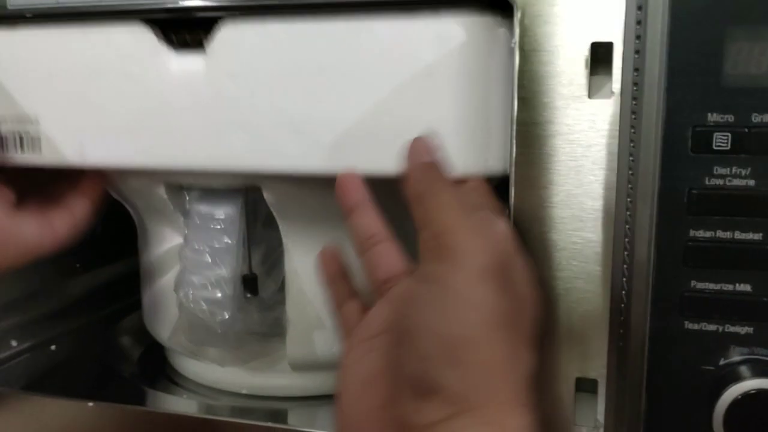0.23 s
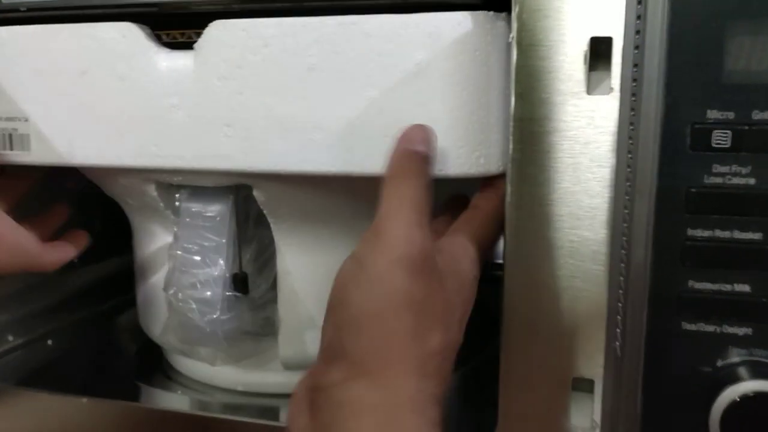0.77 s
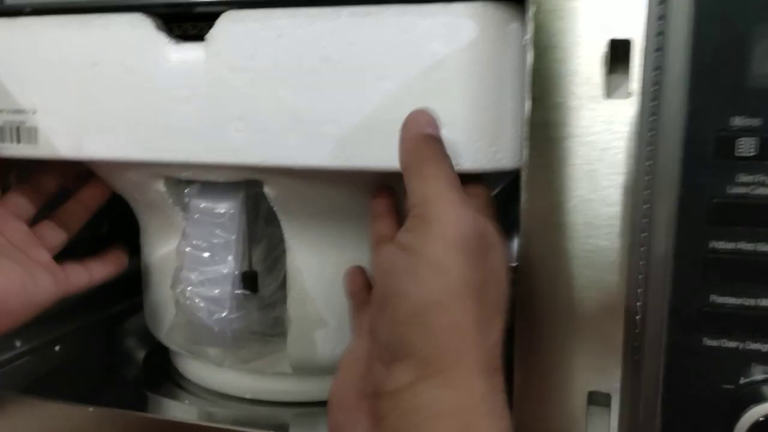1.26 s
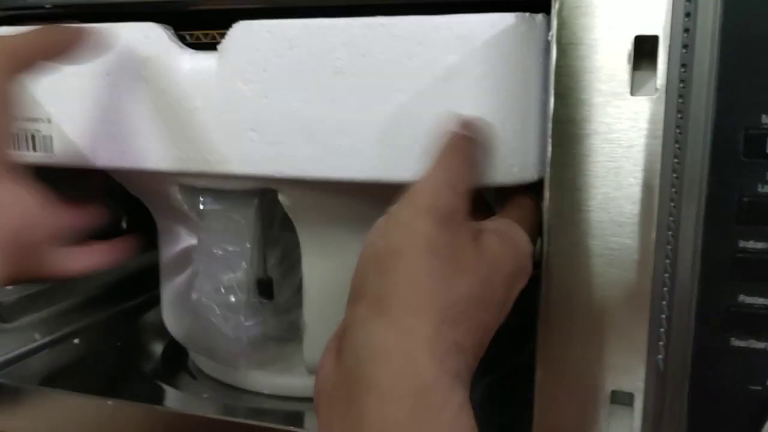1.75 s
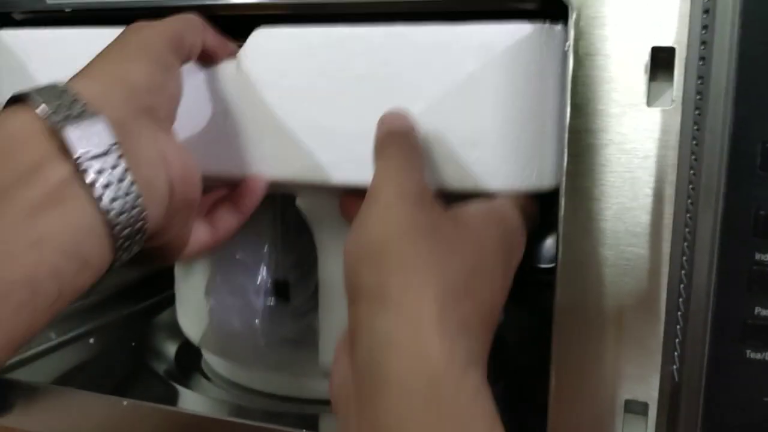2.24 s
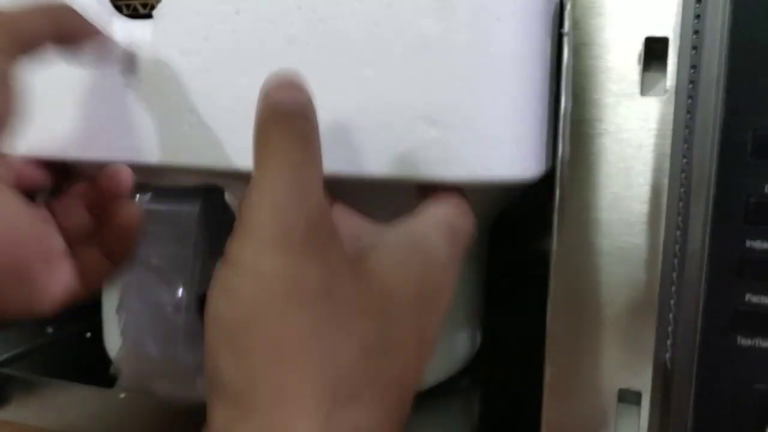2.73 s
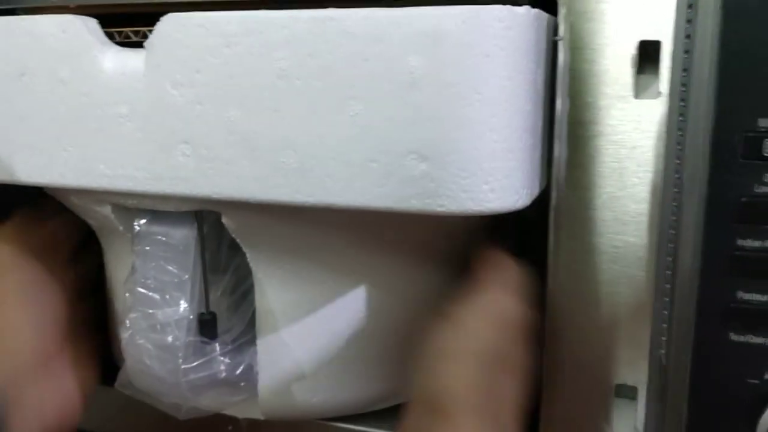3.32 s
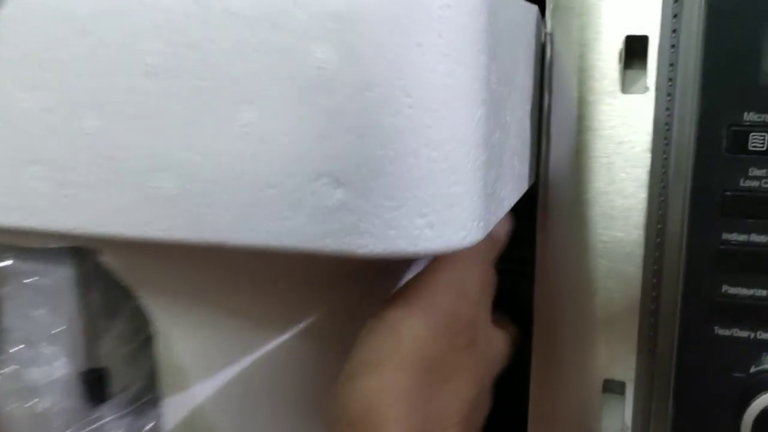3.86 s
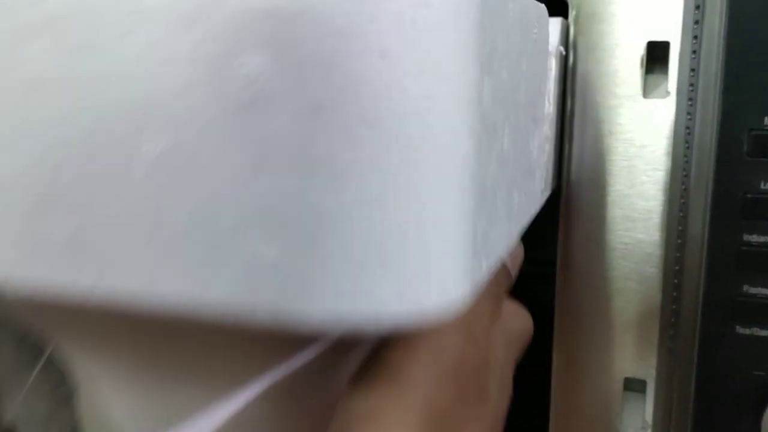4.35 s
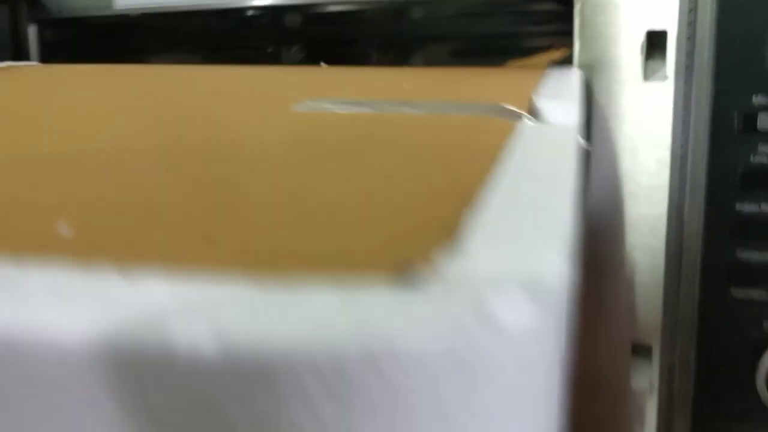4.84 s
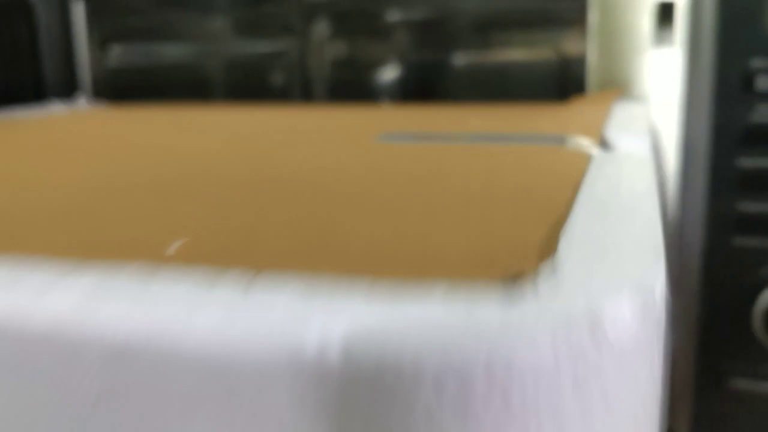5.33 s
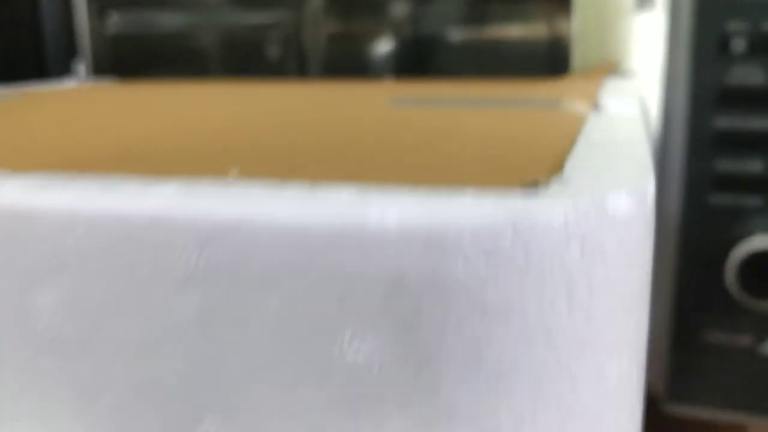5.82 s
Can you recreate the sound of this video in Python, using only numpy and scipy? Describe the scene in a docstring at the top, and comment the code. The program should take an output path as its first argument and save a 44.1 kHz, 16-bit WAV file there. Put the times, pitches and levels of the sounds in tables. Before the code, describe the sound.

A small close microphone hears a packing block being tugged free. First a quick scuff and high chirps, then irregular grainy scrapes, sharp little snaps and hollow panel taps. A long dry slide with piercing squeaks follows, fades almost to quiet, and ends with a boomy casing bump and a short rustle indoors.

```python
"""Inside a metal oven cavity, hands work out a foam packing block, heard by a small close microphone, bright on top.
Rubbing foam is one stream of random bead slips, as fine hiss and through block, cavity and carton resonances.
Short scuffs lift that stream; gliding slip cycles squeak, noise bursts snap, faint thin tones flicker.
Knocks ring the modes of the sheet-metal casing, which also drones low; squeaks and snaps echo; room tone below."""
import sys
import numpy as np
from scipy import signal
from scipy.fft import rfft, irfft, next_fast_len
from scipy.io import wavfile

SR = 44100
rng = np.random.default_rng(int(sys.argv[2]) if len(sys.argv) > 2 else 0)


def unload_audio(sound):
    """Save the sound as a 16-bit wav file, at the path given as the first command line argument."""
    columns = np.transpose(np.atleast_2d(sound))
    # keep every value between -1 and 1, then stretch to whole-number steps
    steps = np.round(np.clip(columns, -1, 1) * 32767)
    wavfile.write(sys.argv[1], SR, steps.astype(np.int16))


N = 268745
TIME = np.arange(N) / SR
CUTOFF_HZ = 15600

# casing shaken by the load, one table from jolt to jolt: (time [s], panel drone [dB], deep drone [dB])
CASING_SHAKE = [
    [(0.0, -71.5, -80.5), (0.7, -68.5, -70), (0.85, -68, -66), (0.97, -69, -82), (1.13, -61, -67),
     (1.82, -66.5, -85), (2.17, -68, -94), (2.59, -52, -83), (2.83, -69, -87)],
    [(2.85, -45, -75), (3.04, -66.5, -75), (3.42, -62, -68), (3.8, -76, -97), (4.06, -97, -101),
     (4.34, -73, -88.5), (4.78, -70, -82.5), (5.12, -65, -71), (5.29, -64.5, -50)],
    [(5.305, -63, -46), (5.413, -35, -52), (5.487, -40, -46), (5.557, -61.5, -44), (5.797, -68, -46.5),
     (5.957, -69, -57.5), (6.09, -68.5, -73)],
]
# colour of the small microphone, shared by hiss, squeaks and snaps: (frequency [Hz], density [dB per Hz])
MIC_COLOUR = [(590, -51.5), (1000, -15.5), (1080, -39.5), (1200, -9.5), (1710, -15.5), (2060, 0),
              (2450, -9), (3870, 1), (5270, -4.5), (6870, -12.5), (8160, -4), (12300, -3), (15500, 1)]


def amp(db):
    """Decibels to gain."""
    return 10 ** (np.asarray(db) / 20)


def rms_one(x):
    """Scale to rms 1."""
    return x / np.sqrt(np.mean(x ** 2) + 1e-20)


def in_time(rows, t):
    """Columns of a curve, read at times t."""
    s, *columns = np.transpose(rows)
    return [np.interp(t, s, c) for c in columns]


def at_hz(points, hz):
    """Gain of a spectrum table at hz, interpolated over log frequency."""
    f, db = np.transpose(points)
    return amp(np.interp(np.log(np.maximum(hz, 1)), np.log(f), db))


def coloured(x, points):
    """Filter by a spectrum table."""
    size = next_fast_len(len(x) + 512)
    hz = np.arange(size // 2 + 1) * SR / size
    return irfft(rfft(x, size) * at_hz(points, hz), size)[:len(x)]


def drift(rate_hz, size=N):
    """Slow chance of rms 1: noise through two one-pole low-passes."""
    r = np.exp(-2 * np.pi * rate_hz / SR)
    run_in = 4000
    once = signal.lfilter([1 - r], [1, -r], rng.standard_normal(size + run_in))
    twice = signal.lfilter([1 - r], [1, -r], once)
    return rms_one(twice[run_in:])


def ring(x, hz, t60_s):
    """Two-pole resonance: a unit click sets a decaying sine of height 1 ringing."""
    r, w = amp(-60 / (t60_s * SR)), 2 * np.pi * hz / SR
    return signal.lfilter([0, np.sin(w)], [1, -2 * r * np.cos(w), r * r], x + 1e-18)


def beads(per_s, spread_db):
    """Random clicks as foam beads let go, a few much harder than the rest."""
    hardness = np.minimum(rng.exponential(1, N), 5)
    sizes = amp(spread_db * hardness) * rng.choice([-1, 1], N)
    return rms_one(sizes * (rng.random(N) < per_s / SR))


def resonant(x, peaks, patchy_db, patch_rate_hz):
    """Each resonance, applied twice, comes and goes on its own as the contact moves."""
    out = 0
    for hz, width_hz, level_db in peaks:
        t60_s = np.log(1000) / (np.pi * width_hz)
        gain = amp(level_db + patchy_db * drift(patch_rate_hz))
        out = out + gain * rms_one(ring(ring(x, hz, t60_s), hz, t60_s))
    return rms_one(out)


def dying_noise(x, t60_s):
    """Convolve with a dense decaying noise tail of unit energy."""
    tail = rng.standard_normal(SR // 2) * amp(-60 * TIME[:SR // 2] / t60_s)
    return signal.fftconvolve(x, tail / np.sqrt(np.sum(tail ** 2)))[:N]


def room_tone(level_db=-74):
    """Steady noise shaped to the colour of the room."""
    # (frequency [Hz], density [dB per Hz])
    room_colour = [(24, -30), (40, -18), (139, -7.5), (294, 6), (949, -3.5), (1100, 1), (1280, -7.5),
                   (2510, -18), (2710, -34.5), (15500, -39.5)]
    return amp(level_db) * rms_one(coloured(rng.standard_normal(N), room_colour))


def rattle(s, level_db, rise_s=0.005, fade_s=0.08):
    """After each knock the loose parts go on jolting the casing for a while: power in time."""
    power = np.zeros(N)
    for start, gain in zip((s * SR).astype(int), amp(level_db)):
        t = TIME[:min(SR // 2, N - start)]
        shape = np.minimum(t / rise_s, 1) * np.exp(-t / fade_s)
        power[start:start + len(t)] += (gain * shape) ** 2
    return power


def casing(crest_db=9.5, contact_cycles=1.93, upper_drone_db=-9):
    """Soft knocks set modes going with random strengths and signs; the shifting load keeps them droning."""
    # blows: (time [s], peak [dB], deep modes [dB re peak], upper modes [dB re peak])
    knocks = [(0.014, -47, -16, -8.5), (0.195, -40.5, -33, -23), (0.657, -62.5, 26.5, -20),
              (0.692, -29, -4, -46.5), (0.718, -55, -14, -18), (0.78, -36, -16, -29),
              (0.83, -33.5, -34, -19), (0.943, -29, -31, -28), (0.964, -34.5, -35, -9.5),
              (1.006, -32, -40, -5.5), (1.181, -72, -4, -8), (1.397, -57.5, -20, 10),
              (1.5, -39.5, -35, -14), (1.529, -53, -34, 3), (1.552, -42.5, -34, -6), (1.877, -53, -33, -24),
              (2.001, -64.5, -20, 17.5), (2.087, -48.5, -31, -7), (2.204, -43.5, -42, -32),
              (2.249, -52, -30, 1), (2.466, -32, -39, -3.5), (2.518, -27, -6, 4.5), (2.696, -49.5, -31, 9),
              (2.843, -28, -6, -11), (2.909, -32, -9.5, 3.5), (2.959, -32.5, -29, -9),
              (3.204, -26.5, -36, -50), (3.246, -35, -27, -46), (3.298, -38.5, -20, -15.5),
              (3.444, -55.5, -5, 14.5), (3.691, -48.5, -28, -26), (3.741, -62, -35, -4),
              (4.18, -49, -35, -32), (4.287, -52, -30, -8), (4.336, -52, -30, -4), (4.381, -49, -11, -21.5),
              (4.509, -51.5, -25, 0.5), (4.731, -67, -26, 6), (5.086, -34, -2.5, -28),
              (5.302, -20.5, -2, -4.5), (5.352, -29.5, 7, 3), (5.375, -41, -21, 3), (5.409, -38, -4, -2),
              (5.434, -34, -12, -3), (5.548, -46, -5, 3), (5.669, -54, -8, -49), (5.752, -51.5, 18, -32),
              (5.86, -51.5, -8.5, -15)]
    # casing modes, low to high: (frequency [Hz], level [dB], t60 of a knock [s])
    deep = [(66, -14, 0.087), (111.4, -0.5, 0.12)]
    panel = [(148.7, -15.5, 0.52), (192.7, -2.5, 0.22), (220, -3.5, 0.14), (257.8, -1, 0.14),
             (321, -6.5, 0.16)]
    upper = [(394.4, 0, .1), (470, 3.5, 0.14), (532, -6.5, 0.11), (580.6, -14, 0.34), (767, -10, 0.094)]
    s, peak_db, deep_db, upper_db = np.transpose(knocks)
    panel_drone_db, deep_drone_db = in_time(np.concatenate(CASING_SHAKE), TIME)
    groups = (
        (deep, deep_db, deep_drone_db),
        (panel, 0, panel_drone_db),
        (upper, upper_db, panel_drone_db + upper_drone_db),
    )
    at, out = (s * SR).astype(int), 0
    for modes, re_db, drone_db in groups:
        luck_db = rng.normal(0, 1.94, (len(s), len(modes)))
        sign = rng.choice([-1, 1], (len(s), len(modes)))
        drone = 0
        for (hz, level_db, t60_s), chance_db, side in zip(modes, luck_db.T, sign.T):
            blows = np.zeros(N)
            blows[at] = side * amp(peak_db + re_db + level_db + chance_db - crest_db)
            # foam gives way: the mode builds up over a cycle or two
            swell = np.hanning(int(contact_cycles * SR / hz) + 3)
            push = 2 * swell * np.sin(2 * np.pi * hz * TIME[:len(swell)]) / swell.sum()
            out = out + ring(signal.oaconvolve(blows, push)[:N], hz, t60_s)
            jolts = signal.oaconvolve(beads(450, spread_db=7.5), push)[:N]
            gain = amp(level_db + 2.4 * drift(5.3))
            drone = drone + gain * rms_one(ring(jolts, hz, 0.48 * t60_s))
        level = np.sqrt(amp(drone_db) ** 2 + rattle(s, peak_db + re_db - 11.5))
        out = out + level * rms_one(drone)
    return out


def thin_tones(width_share=0.028, fade_s=0.022):
    """Faint, thin flickering tones: slow noise on a gliding sine and cosine, a narrow rough band."""
    # (time [s], length without fades [s], start [Hz], end [Hz], level [dB])
    tone_rows = [(0.024, 0.038, 1217, 1250, -57), (0.697, 0.069, 1154, 1165, -63.5),
                 (0.83, 0.077, 1195, 1176, -67.5), (1.392, 0.03, 2590, 2510, -60),
                 (1.488, 0.088, 1250, 1232, -55.5), (1.722, 0.047, 1127, 1086, -60),
                 (1.814, 0.11, 4600, 3810, -59), (2.426, 0.083, 2310, 2400, -67),
                 (2.839, 0.023, 1920, 1780, -48.5), (2.848, 0.14, 1365, 1294, -64),
                 (2.864, 0.097, 3200, 3150, -59.5), (1.952, 0.04, 1990, 1960, -74),
                 (2.018, 0.025, 2700, 2480, -67), (2.903, 0.22, 5480, 4500, -72),
                 (2.915, 0.076, 1700, 1750, -52.5), (2.979, 0.06, 1063, 1005, -66),
                 (3.218, 0.044, 2260, 2190, -56.5), (3.366, 0.16, 2080, 2200, -57.5),
                 (3.416, 0.065, 3070, 3170, -62), (3.688, 0.036, 1210, 1150, -61),
                 (3.655, 0.203, 2060, 2000, -54.5), (4.107, .13, 2140, 2160, -59.5),
                 (3.967, 0.026, 1584, 1580, -61), (4.237, 0.045, 823, 836, -60),
                 (4.35, 0.138, 1195, 1130, -62.5), (4.728, 0.045, 1768, 1760, -67),
                 (4.729, 0.034, 2600, 2600, -68), (5.234, 0.0091, 984, 1010, -55.5),
                 (5.527, 0.057, 1020, 955, -53), (5.643, 0.047, 719, 732, -56.5),
                 (5.781, 0.068, 1350, 1300, -71.5)]
    out = np.zeros(N)
    for s, length_s, start_hz, end_hz, level_db in tone_rows:
        t = TIME[:int((length_s + 2 * fade_s) * SR)]
        phase = 2 * np.pi * np.cumsum(np.linspace(start_hz, end_hz, len(t))) / SR
        a = drift(width_share * start_hz, size=SR // 2)[:len(t)]
        b = drift(width_share * start_hz, size=SR // 2)[:len(t)]
        flicker = amp(3.2 * drift(25, size=SR // 2))[:len(t)]
        tone = flicker * (a * np.sin(phase) + b * np.cos(phase))
        fade = np.clip(np.minimum(t, t[-1] - t) / fade_s, 0, 1)
        at = int(s * SR)
        out[at:at + len(t)] += amp(level_db) * tone * fade
    return out


def block_db(hiss_db, cavity_db, follows_hiss=0.57, offset_db=-4):
    """The block's ring lies between the hiss and the cavity ring, plus an offset."""
    return offset_db + follows_hiss * hiss_db + (1 - follows_hiss) * cavity_db


def scuff_levels(crest_db, rise_s, fade_per_hold=1.83):
    """Power of the four rubbing layers as the foam catches: quick rise, short hold, decay."""
    # (time [s], peak [dB], cavity ring [dB re peak], carton ring [dB re peak], hold [s])
    scuffs = [(.0094, -34, -41, -23, .018), (.0343, -23.5, -38, -47, .028),
              (0.1128, -9.5, -20.5, -52, 0.023), (0.459, -30.5, -33, -23.5, 0.021),
              (.5194, -37.5, -39.5, -22, 0.017), (0.7046, -26, -28.5, -44, 0.036),
              (1.0394, -13.5, -14, -13.5, 0.026), (1.1343, -21.5, -22, -13, 0.023),
              (1.181, -18.5, -25, -31, 0.013), (1.2017, -15, -43, -32, 0.013),
              (1.2157, -11.5, -22.5, -35, 0.013), (1.342, -26, -56, -45, 0.0069),
              (1.397, -29.5, -21, -21.5, 0.021), (1.468, -28, -24, -33, 0.03), (1.5, -28.5, -19, -13, 0.02),
              (1.5276, -22.5, -22.5, -32, 0.027), (1.5554, -25.5, -23, -20, 0.019),
              (1.6167, -28.5, -34, -35, 0.055), (1.691, -19, -46, -46, 0.0064),
              (1.7994, -33.5, -45, -20.5, 0.051), (1.882, -23.5, -35, -28, 0.034),
              (1.938, -29, -15, -32, 0.021), (2.057, -27, -36, -32, 0.0071),
              (2.0807, -25, -29, -25, 0.0078), (2.218, -26.5, -30, -47, 0.067),
              (2.255, -32, -5, -41, 0.039), (2.3074, -23, -19.5, -31, 0.047), (2.481, -22, -5, -5, 0.0078),
              (2.5133, -17, -8.5, -9, 0.039), (2.697, -36, -3, -19, 0.0053),
              (2.841, -32, -23.5, -20, 0.013), (2.9024, -28.5, -12, -11, 0.013),
              (3.204, -24.5, -27.5, -38, 0.034), (3.3423, -21.5, -35, -48, 0.013),
              (3.76, -27.5, -10.5, -39, 0.033), (3.935, -46, -26, -45, 0.0066),
              (4.2374, -25, -6.5, -12, 0.012), (4.29, -22, -16, -36, .016),
              (4.699, -24.5, -73, -24, 0.0049), (4.73, -30, -17, -24, 0.014),
              (4.916, -47, -34, -20, 0.0043), (4.9832, -53.5, -30, 0.5, 0.0071),
              (5.0866, -31, -52, -22, 0.016), (5.154, -31, -38, -37, 0.025), (5.2854, -34, -23, -16, .015),
              (5.3036, -24, -13.5, 0.5, 0.022), (5.3592, -22.5, -9, -4, 0.017),
              (5.74, -28.5, -24, -43, 0.02)]
    power = np.zeros((4, N))
    for s, peak_db, cavity_db, carton_db, hold_s in scuffs:
        i = slice(max(int((s - .01) * SR), 0), int((s + .5) * SR))
        t = TIME[i] - s
        rise = np.clip(t / rise_s + .5, 0, 1)
        decay = np.exp(-np.maximum(t - hold_s, 0) / max(fade_per_hold * hold_s, .002))
        layers_db = np.array([0, block_db(0, cavity_db) - 0.5, cavity_db, carton_db])
        gains = amp(peak_db - crest_db + layers_db)[:, None]
        power[:, i] += (gains * (rise * decay)) ** 2
    return power


def rubbing(carton_offset_db=-5.5):
    """One stream of bead slips heard as treble hiss and through block, cavity and carton resonances."""
    # steady rubbing, one table a pull: (time [s], bead hiss [dB], cavity ring [dB])
    pulls = [
        [(0.0, -70, -75), (0.09, -44.5, -63), (0.268, -35.5, -57), (0.404, -39.5, -66), (0.528, -49, -79),
         (0.69, -67, -77)],
        [(0.7, -47, -67), (0.76, -43, -80), (0.88, -40.5, -73), (1.01, -37, -47.5), (1.13, -37.5, -48),
         (1.27, -49, -53), (1.38, -49.5, -74), (1.67, -66, -73.5), (2.04, -44.5, -66), (2.29, -52.5, -82),
         (2.43, -37, -68), (2.51, -41, -44), (2.67, -45, -56), (2.83, -48.5, -95)],
        [(2.845, -36, -74), (2.993, -43.5, -76), (3.195, -46.5, -77)],
        [(3.205, -53.5, -81), (3.283, -51, -70), (3.403, -42.5, -58.5), (3.559, -36, -63.5), (3.961, -36, -62),
         (4.055, -34, -53.5), (4.217, -39, -50.5), (4.341, -38, -56), (4.493, -38, -64), (4.603, -49.5, -84),
         (4.879, -65, -79.5), (5.08, -84, -73.5)],
        [(5.09, -72, -74), (5.308, -55, -74), (5.432, -41.5, -67), (5.664, -53, -78.5), (5.735, -67.5, -99)],
        [(5.745, -64, -88), (5.903, -77, -77), (6.09, -81, -76.5)],
    ]
    # resonances fed by rubbing: (frequency [Hz], width of one pass [Hz], level [dB])
    block_peaks = [(3240, 97, 1.5), (3884, 180, 0.5), (4405, 1270, 14), (5008, 650, 5.5), (5394, 280, -1)]
    cavity_peaks = [(1851, 140, -1), (1990, 76, -7), (2118, 75, -2), (2258, 91, -2.5), (2631, 300, 2),
                    (2810, 140, 0)]
    carton_peaks = [(737, 240, -2), (861, 55, 0.5), (1014, 140, 3.5), (1199, 84, 2.5), (1330, 91, 2),
                    (1600, 86, -2.5)]
    hiss_db, cavity_db = in_time(np.concatenate(pulls), TIME)
    # the carton rings with the shaken panel
    carton_db = carton_offset_db + in_time(np.concatenate(CASING_SHAKE), TIME)[0]
    layers_db = np.array([hiss_db, block_db(hiss_db, cavity_db), cavity_db, carton_db])
    steady = amp(layers_db + 1.3 * drift(49))
    level = np.sqrt(steady ** 2 + scuff_levels(crest_db=11.0, rise_s=0.0049))
    slips = beads(16000, spread_db=2.5)
    treble = signal.butter(4, 5600, "high", fs=SR, output="sos")
    hiss = rms_one(signal.sosfilt(treble, coloured(slips, MIC_COLOUR)))
    block = resonant(slips, block_peaks, patchy_db=6.0, patch_rate_hz=5.6)
    cavity = resonant(slips, cavity_peaks, patchy_db=3.0, patch_rate_hz=14)
    carton = resonant(slips, carton_peaks, patchy_db=4.5, patch_rate_hz=12)
    return np.sum(level * [hiss, block, cavity, carton], axis=0)


def snaps(rise_s=0.00067, fade_s=0.0014):
    """A stuck edge lets go: milliseconds of high-passed noise in the microphone's colour, dying at once."""
    # (time [s], nominal peak [dB], high-pass corner [Hz])
    snap_rows = [(1.044, -39, 900), (1.205, -58, 3500), (1.353, -29, 4000), (1.549, -14, 4000),
                 (1.695, -32, 3500), (2.260, -23, 1500), (2.483, -21, 900), (2.518, -11, 600),
                 (2.702, -23, 700), (4.089, -11, 6010), (4.241, -18, 800), (4.739, -19, 3500)]
    out, t = np.zeros(N), TIME[:SR // 20]
    noise = rng.standard_normal((len(snap_rows), len(t)))
    shape = np.minimum(t / rise_s, 1) * np.exp(-t / fade_s)
    for (s, peak_db, low_hz), burst in zip(snap_rows, noise):
        high_pass = signal.butter(2, low_hz, "high", fs=SR, output="sos")
        bright = signal.sosfilt(high_pass, coloured(burst, MIC_COLOUR))
        at = int(s * SR)
        out[at:at + len(t)] += amp(peak_db) / 2 * rms_one(bright) * shape
    return out


def squeaks(wobble_hz=1500, slope=0.16, edge_power=2.2, fade_s=0.001):
    """Stick-slip cycles give overtones of a gliding slip rate; roughness wobbles it, smearing them to hiss."""
    # (start [s], time of the middle rate [s], end [s], start, middle and end slip rate [Hz] x 3,
    #  middle level [dB], start and end level [dB re middle] x 2, roughness [0-1]);
    # a middle before the start leaves only the last glide
    squeak_rows = [(0.118, 0.14, .160, 2620, 3710, 5000, -19, -39, -11.5, .17),
                   (0.331, 0.344, .361, 2496, 6050, 15550, -21, -28, -23, 0.23),
                   (0.832, 0.843, .848, 3800, 8270, 9600, -33, -32, -14, .33),
                   (0.856, 0.869, .877, 14600, 14340, 10500, -27.5, -6, -31, 0.065),
                   (.962, 0.982, .985, 2800, 9500, 5460, -35.5, -11, 15, 0.058),
                   (.985, 0.995, 1.016, 4515, 3004, 1180, -33, 12.5, 1, 0.29),
                   (1.234, 1.245, 1.260, 3450, 4000, 10200, -36, -20, 4, 0.45),
                   (1.398, 1.408, 1.420, 12500, 14600, 15000, -36.5, -6, -11, 0.094),
                   (2.56, 2.547, 2.570, 15000, 12860, 10400, -22, -8, -20, 0.14),
                   (2.594, 2.601, 2.640, 14530, 14460, 6520, -20.5, -15, -6.5, 0.12),
                   (3.359, 3.366, 3.371, 6480, 7120, 8700, -25, -43, -33, 0.086),
                   (3.394, 3.389, 3.403, 15500, 15500, 14000, -23, -28.5, -14.5, .07),
                   (3.457, 3.456, 3.462, 14100, 14300, 14600, -32, -10, -6, .05),
                   (3.485, 3.487, 3.488, 13000, 13500, 14400, -26, -17, 8, .04),
                   (3.493, 3.514, 3.530, 10450, 7450, 13800, -26.5, -13, -9, 0.095),
                   (3.823, 3.854, 3.880, 14160, 14500, 14500, -15, -14, -15, 0.22),
                   (3.842, 3.862, 3.866, 12300, 12080, 12800, -26.5, -9.5, -5.5, 0.07),
                   (3.973, 3.98, 3.998, 14100, 13200, 15100, -27.5, -10, -9, 0.24),
                   (4.019, 4.041, 4.050, 14400, 13560, 7020, -20, -17.5, -8, .13),
                   (4.046, 4.071, 4.088, 5993, 2120, 2300, -18.5, -10.5, -1, .22),
                   (4.084, 4.08, 4.102, 5950, 10100, 14400, -20, -7, -13.5, 0.11)]
    out, k = np.zeros(N), np.arange(1, 10)[:, None]
    for s, middle, end, *hz, middle_db, start_db, end_db, rough in squeak_rows:
        i = slice(int(s * SR), int(end * SR))
        t = TIME[i]
        rate_hz = np.exp(np.interp(t, [s, middle, end], np.log(hz)))
        # the level stays near its middle value and changes late
        away = np.interp(t, [s, middle, end], [-1, 0, 1])
        level_db = middle_db + np.where(away < 0, start_db, end_db) * np.abs(away) ** edge_power
        fade = np.clip(np.minimum(t - s, end - t) / fade_s, 0, 1)
        wobble = np.tanh(drift(wobble_hz, size=SR // 8))[:len(rate_hz)]
        wobbly_hz = rate_hz * np.exp(np.clip(rough, .04, 1) * wobble)
        phase = 2 * np.pi * np.cumsum(wobbly_hz) / SR
        share = k ** -slope * (k * rate_hz < CUTOFF_HZ)
        tone = np.sum(share * (k * wobbly_hz < SR / 2) * np.sin(k * phase), axis=0)
        # expected rms after the microphone's colour
        size = np.sqrt(np.sum((share * at_hz(MIC_COLOUR, k * rate_hz)) ** 2, axis=0) / 2)
        # the grip flutters from slip to slip
        grain = amp(2 * drift(600, size=SR // 8))[:len(rate_hz)]
        out[i] += coloured(tone * grain * fade * amp(level_db) / size, MIC_COLOUR)
    return out


def scene():
    """Squeaks and snaps ring on in the block's many small modes, then echo in the metal cavity; all layers add."""
    catches = squeaks() + snaps()
    catches = catches + amp(-3.5) * dying_noise(catches, t60_s=0.017)
    echo = amp(-13.5) * dying_noise(catches, t60_s=0.36)
    background = room_tone()
    return (rubbing() + catches + echo + casing() + thin_tones() + background)[None, :]


def record(dry):
    """The small microphone loses the deep bass; the top is cut steeply."""
    thin = signal.sosfilt(signal.butter(2, 60, "high", fs=SR, output="sos"), dry)
    return signal.sosfilt(signal.ellip(12, .5, 75, CUTOFF_HZ, fs=SR, output="sos"), thin)


dry = scene()
out = record(dry)
unload_audio(out)
```